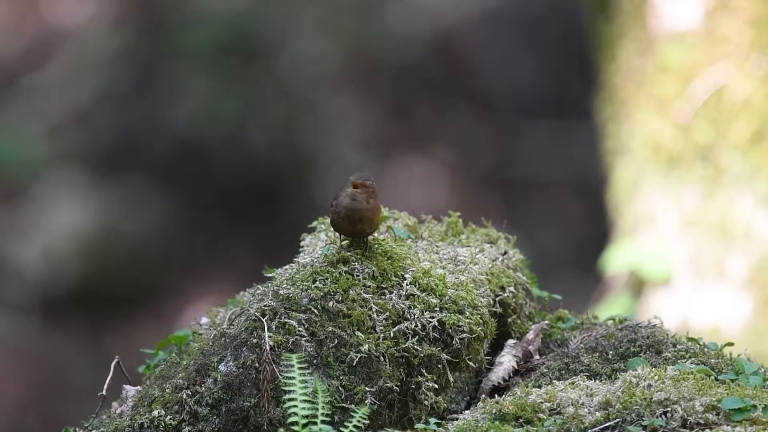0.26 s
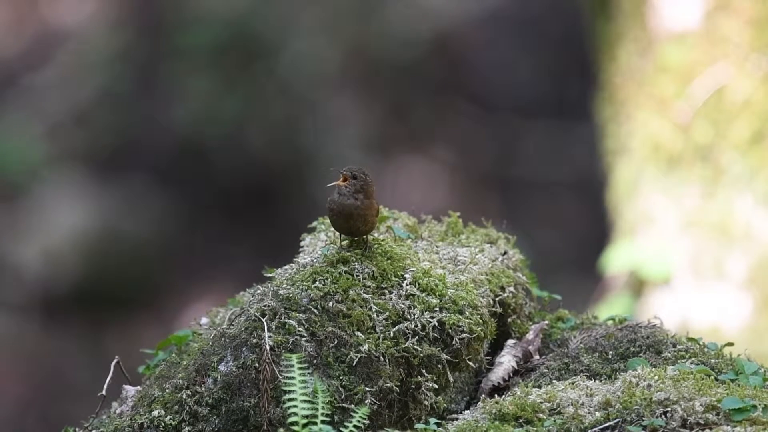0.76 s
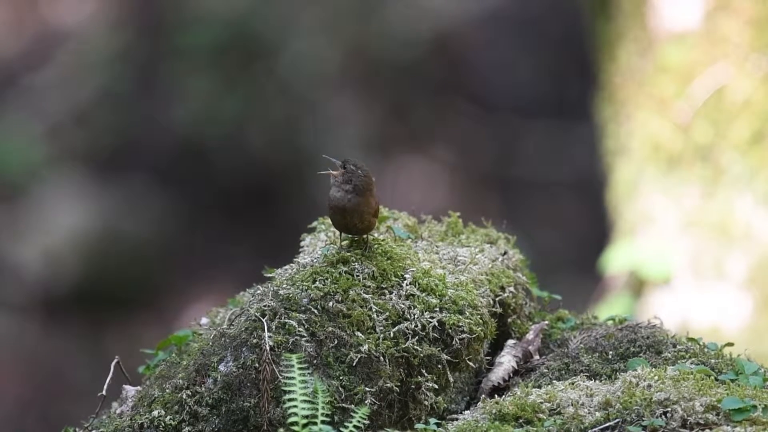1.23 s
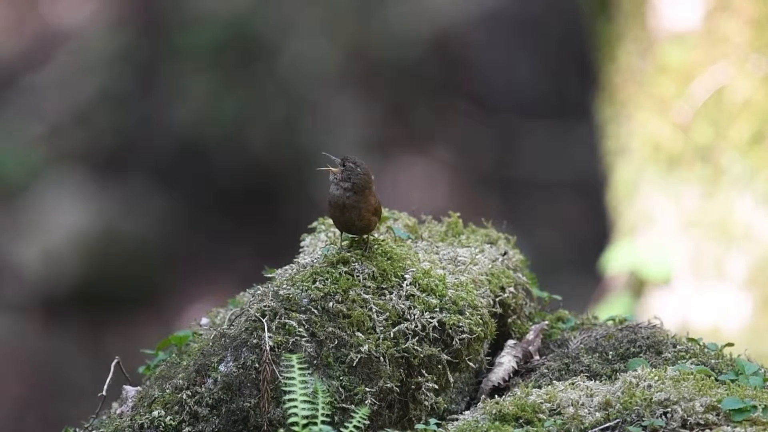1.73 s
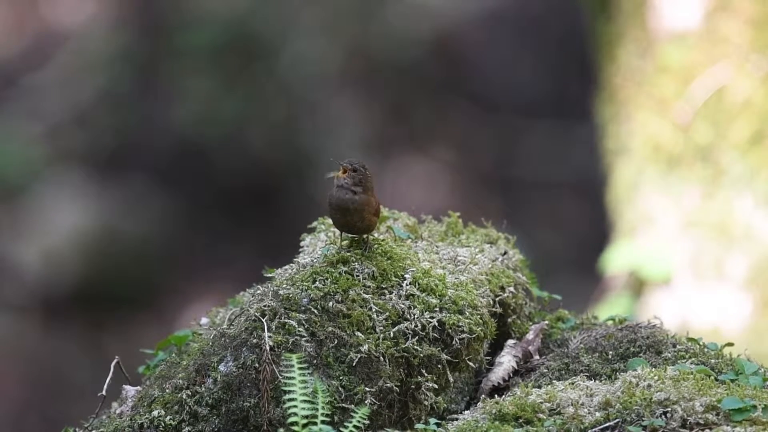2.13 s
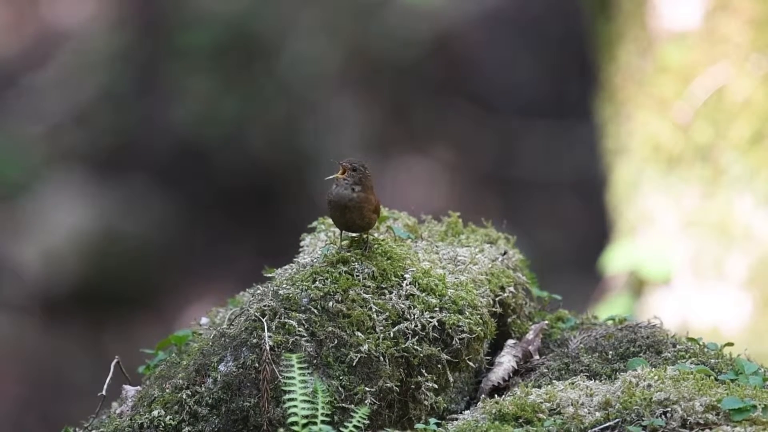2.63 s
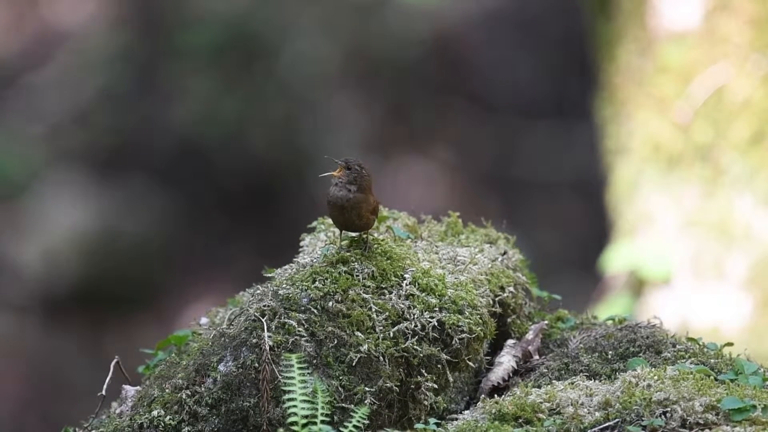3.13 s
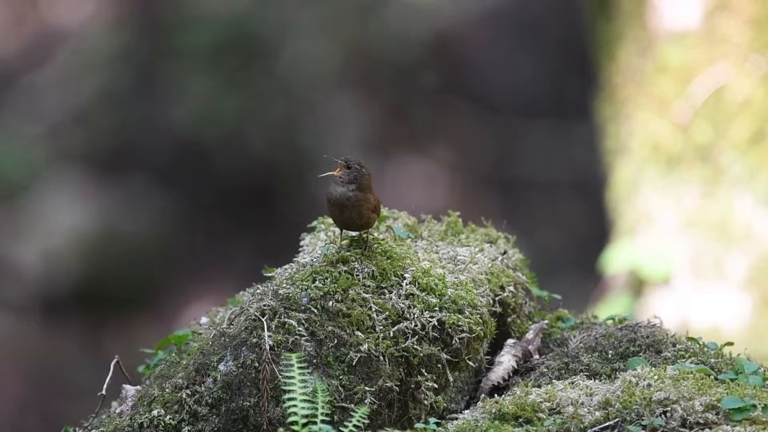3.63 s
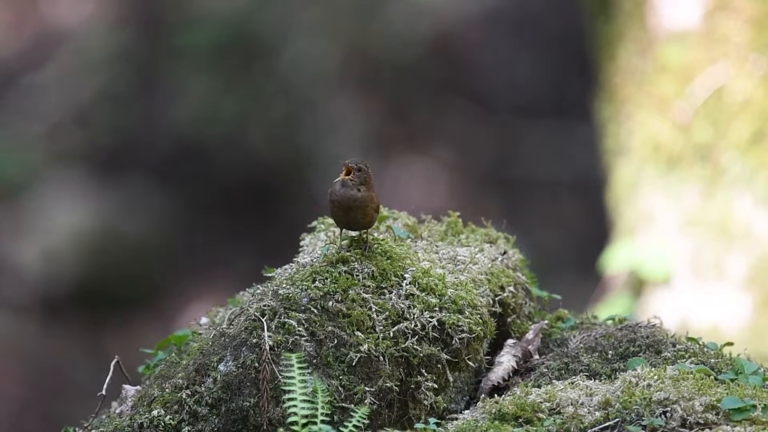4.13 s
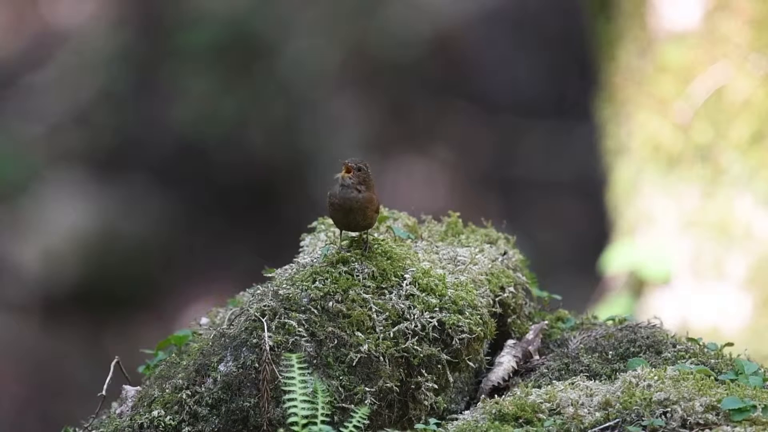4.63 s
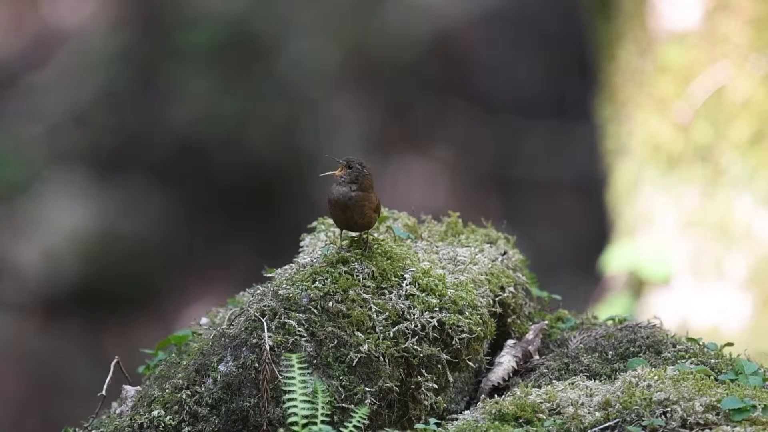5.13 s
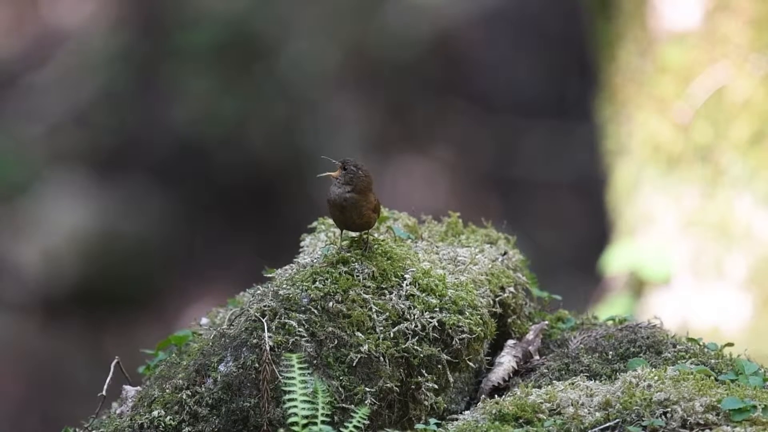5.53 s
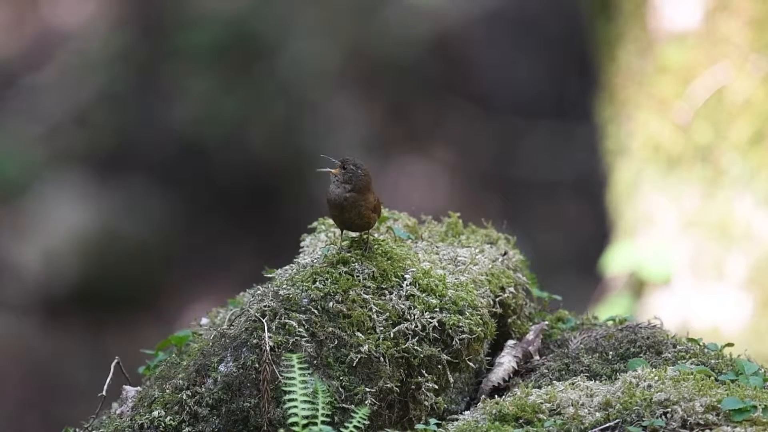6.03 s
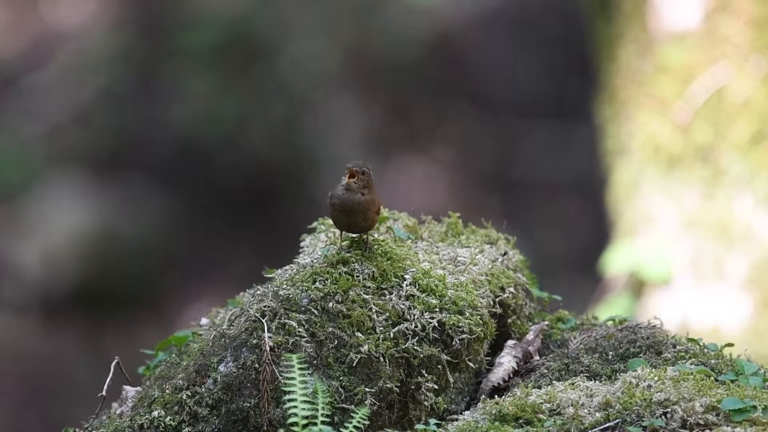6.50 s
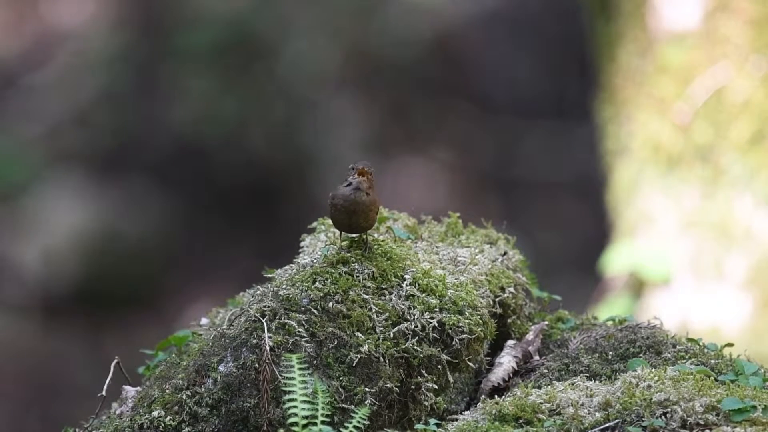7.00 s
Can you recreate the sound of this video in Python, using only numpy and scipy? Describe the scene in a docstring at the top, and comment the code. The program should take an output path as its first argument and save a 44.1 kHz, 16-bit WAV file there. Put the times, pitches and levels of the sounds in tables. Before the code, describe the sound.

Rapid high bird song, thin sliding whistles, sharp chips and a rattling trill, rings lightly among trees above constant rushing water.

```python
"""Wren beside a ravine stream

A wren sings one long song from a mossy rock in a wooded ravine, over the even rush of a stream.
Its voice is a nearly pure gliding sine: slurs and chips, practised figures, dry trills, a run of upsweeps.
The ground returns one quick echo; trunks and rocks scatter every note into a short tail of small echoes.
The bird sits almost straight ahead; the water, shaped from noise, is central in the bass, wide in the treble."""
import sys
import numpy as np
from scipy import signal
from scipy.fft import rfft, irfft
from scipy.io import wavfile
from scipy.ndimage import uniform_filter1d

SR = 44100
rng = np.random.default_rng(int(sys.argv[2]) if len(sys.argv) > 2 else 0)


def dump(signal):
    """Clip the signal to [-1, 1] and save it as 16-bit WAV at the path in sys.argv[1]."""
    limited = np.clip(np.atleast_2d(signal).T, -1, 1)
    pcm = np.round(limited * 32767).astype(np.int16)
    wavfile.write(sys.argv[1], SR, pcm)


N = 320166  # length in samples


def from_db(db):
    """Decibels to gain."""
    return 10 ** (np.asarray(db) / 20)


def rms_one(x):
    """Scale to unit rms."""
    return x / np.sqrt(np.mean(x ** 2) + 1e-20)


def at_hz(points, hz, axis=1):
    """Read one column of a table along log frequency."""
    table = np.array(points)
    return np.interp(np.log(np.maximum(hz, 1)), np.log(table[:, 0]), table[:, axis])


def drift(rate_hz, size):
    """Smooth random wander of spread 1: noise through two equal one-pole low-passes."""
    pole = np.exp(-2 * np.pi * rate_hz / SR)
    lead_in = SR // 10  # lets the filter settle; cut off again below
    noise = rng.standard_normal(size + lead_in)
    slow = signal.lfilter([1], [1, -2 * pole, pole * pole], noise)
    return rms_one(slow)[-size:]


def stream(level_db=-33.5, churn_db=0.86, churn_hz=14):
    """Countless far splashes merge into a rush of shaped noise; each octave of it churns a little."""
    # relative spectrum of the water: hz, density_db (per Hz)
    spectrum = [(30, -32), (55, -18), (90, -3), (150, -2), (270, -6), (450, -1.5), (750, -3.5), (1700, -1),
                (3200, -4), (6000, -6.5), (8800, -9), (10500, -17), (12500, -26.5), (15500, -32.5)]
    # its spread between the microphones: hz, side_minus_mid_db, left_minus_right_db
    spread = [(130, -51, 0), (330, -30.5, 0.1), (700, -11.5, -0.5), (1440, -2, -2), (3100, 0.5, -1.3),
              (9000, 0, -3.5), (14000, -1.5, -3)]
    hz = np.arange(N // 2 + 1) * SR / N
    sides = np.array([[1], [-1]])  # left, right
    width = from_db(at_hz(spread, hz))
    mid, side = rfft(rng.standard_normal((2, N)))
    balance_db = sides * at_hz(spread, hz, axis=2) / 2
    colour = from_db(at_hz(spectrum, hz) + balance_db)
    rush = colour * (mid + sides * width * side) / np.hypot(1, width)
    # everything below 256 Hz churns together, as does everything above 8192 Hz
    octave = np.clip(np.log2(np.maximum(hz, 1)).astype(int), 7, 13)
    water = np.zeros((2, N))
    for k in np.unique(octave):
        band = irfft(rush * (octave == k), N)
        water += band * from_db(churn_db * drift(churn_hz, N))
    return from_db(level_db) * rms_one(water)


def whistle(points, waver_share=.0009, waver_hz=180, flutter_db=1.09, third_db=-54, edge_s=0.00037):
    """One stereo note: a sine on a gliding pitch, with a slight tremor and two faint overtones."""
    # the throat lets more of the octave through on low notes: pitch_hz, octave_db
    octave_levels = [(4100, -34), (4750, -31.5), (5000, -42), (6500, -48)]
    # the bird almost straight ahead, by pitch: pitch_hz, left_minus_right_db, left_lag_radians
    bearing = [(4100, 2, 0.18), (4940, 0, 0.56), (5860, 1.7, 0.28), (6950, 1, 1.51), (8250, -1, 0.76)]
    s, hz, db = np.transpose(points)
    t = np.arange(s.min(), s.max(), 1 / SR)
    # the muscles of the syrinx round the corners of each glide
    smooth_hz = uniform_filter1d(np.interp(t, s, hz), size=161, mode="nearest")
    pitch = smooth_hz * (1 + waver_share * drift(waver_hz, len(t)))

    from_edge_s = np.minimum(t - t[0], t[-1] - t)
    fade = np.sin(np.pi / 2 * np.clip(from_edge_s / edge_s, 0, 1))
    loudness = fade * from_db(np.interp(t, s, db) + flutter_db * drift(waver_hz, len(t)))

    # the left microphone hears each cycle a little later than the right
    sides = np.array([[.5], [-.5]])
    phase = 2 * np.pi * np.cumsum(pitch) / SR - sides * at_hz(bearing, pitch, axis=2)
    second = from_db(at_hz(octave_levels, pitch)) * np.sin(2 * phase)
    third = from_db(third_db) * np.sin(3 * phase)
    tone = np.sin(phase) + second + third
    return loudness * from_db(sides * at_hz(bearing, pitch)) * tone


def glides(rows, attack_s, release_s, sag):
    """Notes of one bend: pitch follows a parabola, sagging while the throat opens and closes."""
    # how strongly the notes sound at each pitch: pitch_hz, gain_db
    carry = [(3700, 2.5), (4100, -6.5), (4600, -0.06), (6500, 0.5), (7000, -3.5), (7400, -6), (7900, -0.2),
             (8500, 2.5)]
    opening_share, opening_s, closing_share, closing_s = sag
    share = np.linspace(0, 1, 200)
    notes = []
    for start, length, first_hz, middle_hz, last_hz, level_db, *swell in rows:
        since, until = share * length, (1 - share) * length
        bend = np.polyfit([0, .5, 1], [first_hz, middle_hz, last_hz], 2)
        hz = np.polyval(bend, share)
        attack = np.sin(np.pi / 2 * np.minimum(since / attack_s, 1))
        release = np.sin(np.pi / 2 * np.minimum(until / release_s, 1))
        gate_db = 20 * np.log10(attack * release + 1e-6)
        swell_db = sum(swell) * (share - .5)  # zero for notes without a swell
        db = level_db + swell_db + at_hz(carry, hz) + gate_db
        opening_sag = opening_share * np.maximum(1 - since / opening_s, 0) ** 2
        closing_sag = closing_share * np.maximum(1 - until / closing_s, 0) ** 2
        notes.append(np.c_[start + since, hz * (1 - opening_sag - closing_sag), db])
    return notes


def slurs():
    """Whistles with one smooth bend, swelling or fading from start to end."""
    # each slur, before sag and carry: start_s, length_s, first_hz, middle_hz, last_hz, level_db, swell_db
    slur_rows = [(0.031, 0.029, 4580, 4810, 5860, -14, -10), (0.113, 0.021, 8200, 8220, 7950, -26.5, -2),
                 (0.166, 0.137, 7070, 7540, 7680, -18.5, 1), (0.365, 0.066, 6040, 5470, 5534, -8, -6),
                 (0.541, 0.11, 6660, 6750, 6020, -11.5, 5), (0.78, 0.038, 7000, 5370, 5340, -6, -5.5),
                 (1.083, 0.11, 7540, 7830, 7300, -14, 2), (2.483, 0.097, 8040, 8360, 8460, -16, 1),
                 (2.632, 0.11, 7390, 6940, 5390, -10.5, 13.0), (3.008, 0.037, 6600, 5990, 5920, -5, 5),
                 (3.212, 0.038, 6680, 5806, 5910, -5.0, -6), (3.686, 0.089, 8820, 7075, 6850, -10.5, 10.5),
                 (5.191, 0.029, 8950, 7820, 7900, -12.5, -6.5), (5.246, 0.136, 6950, 7560, 7970, -13.5, 0),
                 (6.39, 0.073, 5750, 5385, 5150, -6.0, 0.5)]
    # pitch sag as the throat opens and closes: start_share, opening_s, end_share, closing_s
    slur_sag = (0.0377, 0.015, 0.051, 0.0098)
    return glides(slur_rows, attack_s=.026, release_s=0.013, sag=slur_sag)


def chips():
    """Short sharp notes that arch or dive on one quick bend."""
    # each chip, before sag and carry: start_s, length_s, first_hz, middle_hz, last_hz, level_db
    chip_rows = [(0.469, 0.025, 4220, 4240, 3780, -10), (0.67, 0.016, 4530, 4630, 4490, -13.0),
                 (0.71, 0.028, 4380, 4200, 3990, -10.0), (2.176, 0.05, 5760, 4830, 4020, -6.5),
                 (2.268, 0.016, 4470, 5020, 4580, -10.5), (2.291, 0.044, 6100, 4490, 4050, -7),
                 (2.373, 0.018, 4350, 4970, 4620, -11), (2.396, 0.04, 5860, 4530, 4000, -7),
                 (2.772, 0.015, 4220, 4590, 4350, -9.0), (2.816, 0.03, 4590, 5000, 4220, -9.5),
                 (3.423, 0.039, 5020, 4740, 4154, -8.5), (3.623, 0.015, 4100, 4200, 4100, -15.5),
                 (3.811, 0.051, 5830, 4870, 3980, -7), (3.9, 0.047, 5530, 4740, 3910, -7),
                 (5.434, 0.023, 5800, 6180, 6210, -11), (5.665, 0.021, 5980, 6170, 6900, -12),
                 (5.911, 0.019, 5950, 5980, 6520, -10.5), (6.496, 0.033, 4390, 4285, 3900, -9.5),
                 (6.752, 0.02, 5210, 5070, 5130, -14.0), (6.809, 0.023, 5580, 5700, 5810, -8.5),
                 (6.949, 0.022, 5330, 5690, 5610, -8)]
    # pitch sag as the throat opens and closes: start_share, opening_s, end_share, closing_s
    chip_sag = (.01, 0.007, 0.019, 0.0046)
    return glides(chip_rows, attack_s=0.0094, release_s=0.0098, sag=chip_sag)


def figures(shape, rows):
    """One practised shape, stretched to the length and pitch range of each row."""
    share, climb, db = np.transpose(shape)
    notes = []
    for start, length, low_hz, high_hz, level_db in rows:
        hz = low_hz + climb * (high_hz - low_hz)
        notes.append(np.c_[start + share * length, hz, level_db + db])
    return notes


def held_whistles():
    """Overshoots a little, settles on its pitch and droops as it stops."""
    # the gesture: length_share, pitch_range_share, relative_db
    held_shape = [(0, .6, -19), (.1, .82, -6.5), (.24, 0.7, -2), (.4, .57, 0.5), (.87, 0.58, -0.5),
                  (.95, .42, -3), (1, .05, -13)]
    # each time it is sung: start_s, length_s, low_hz, high_hz, level_db
    held_rows = [(0.847, 0.033, 5816, 6000, -6), (1.252, 0.087, 4560, 4950, -9),
                 (3.313, 0.075, 3760, 4340, -13), (3.508, 0.082, 4730, 5135, -5),
                 (6.150, 0.089, 4510, 5016, -8.5)]
    return figures(held_shape, held_rows)


def flourishes():
    """Gliding figures sung only once each, drawn as short curves."""
    # one curve for each flourish: time_s, pitch_hz, level_db
    curves = [
        [(0.922, 7140, -29), (0.963, 7910, -13), (0.993, 7430, -21.5), (1.017, 7200, -16), (1.033, 7270, -19.5)],
        [(2.007, 5000, -24), (2.012, 5210, -14.5), (2.034, 5277, -5.5), (2.046, 5640, -5), (2.055, 6200, -11.5),
         (2.066, 7600, -22.5), (2.084, 7920, -18), (2.13, 7420, -19)],
        [(4.432, 5860, -20), (4.447, 5930, -4), (4.491, 5892, -5), (4.526, 4640, -9), (4.532, 4180, -30)],
        [(6.577, 6500, -24), (6.583, 6700, -14), (6.6, 7400, -17), (6.626, 8320, -15.5), (6.673, 7340, -21.5),
         (6.702, 7100, -8), (6.714, 6510, -11), (6.717, 6540, -36)],
    ]
    return list(curves)


def trills(tick_s=0.0155, tick_low_hz=3655, uneven_db=0.5, uneven_hz=28):
    """Tiny upward flicks at an even pace, each a little different in strength and top pitch."""
    # one tick: length_share, pitch_range_share, relative_db
    tick_shape = [(0, 0.058, -21), (.27, 0.47, -16.5), (.47, 0.92, -4), (.6, 1, 1), (.78, .98, -2.5),
                  (1, 0.97, -14)]
    # each run: first_tick_s, last_tick_s, ticks_per_s, mean_top_hz, first_level_db, last_level_db
    trill_rows = [(1.357, 1.394, 28, 4790, -14.5, -14.5), (1.4266, 1.9506, 30.5, 4715, -11.5, -13),
                  (6.260, 6.33, 28, 4830, -17, -12.5)]
    ticks = []
    for first, last, per_s, top_hz, first_db, last_db in trill_rows:
        count = round((last - first) * per_s) + 1
        for start, level_db in np.linspace((first, first_db), (last, last_db), count):
            pitch, strength = rng.standard_normal(2)
            tick_top_hz = top_hz + uneven_hz * pitch
            tick_db = level_db + uneven_db * strength
            ticks.append((start, tick_s, tick_low_hz, tick_top_hz, tick_db))
    return figures(tick_shape, ticks)


def hooks():
    """A held note that breaks and falls."""
    # the gesture: length_share, pitch_range_share, relative_db
    hook_shape = [(0, 0.21, -23), (.04, 0.69, -5), (.1, 0.93, -1.5), (.56, 0.96, -5.5), (.665, 0.63, -15),
                  (.73, .53, -9), (.935, 0.21, 0), (1, 0.049, -14)]
    # each time it is sung: start_s, length_s, low_hz, high_hz, level_db
    hook_rows = [(2.891, 0.11, 4840, 6610, -5), (3.101, .106, 4840, 6565, -5.5)]
    return figures(hook_shape, hook_rows)


def upsweeps():
    """Notes that climb ever faster, most of them in one close run."""
    # the gesture: length_share, pitch_range_share, relative_db
    upsweep_shape = [(0, 0, -20.5), (.2, .18, -7), (.39, .25, -0.5), (.61, .41, 0), (.8, .66, -.5),
                     (.91, 0.84, -0.5), (1, 1, -17)]
    # each time it is sung: start_s, length_s, low_hz, high_hz, level_db
    upsweep_rows = [(3.976, 0.065, 3990, 6060, -6.5), (4.571, .044, 4030, 6140, -7),
                    (4.649, .044, 4030, 6210, -7.5), (4.723, .044, 4010, 6290, -7),
                    (4.797, 0.042, 4060, 6040, -7), (4.873, 0.042, 4030, 6040, -6.5),
                    (4.947, .044, 4030, 6200, -6.5), (5.022, .044, 4010, 6270, -7.5),
                    (5.099, .044, 3990, 6320, -7.5)]
    return figures(upsweep_shape, upsweep_rows)


def leaps():
    """A loud low note jumps to a thin top and comes back."""
    # the gesture: length_share, pitch_range_share, relative_db
    leap_shape = [(0, 0.147, -16), (.145, 0.057, 0), (.325, 0.015, 0), (.47, 0.61, -9), (.57, 0.99, -8),
                  (.72, .9, -18), (.82, .52, -15), (.94, .34, -4.5), (1, 0.14, -18)]
    # each time it is sung: start_s, length_s, low_hz, high_hz, level_db
    leap_rows = [(4.090, 0.12, 6380, 7940, -5), (4.260, .120, 6500, 7870, -6.5)]
    return figures(leap_shape, leap_rows)


def scoops():
    """Dips onto a held pitch, then fades and curls upward."""
    # the gesture: length_share, pitch_range_share, relative_db
    scoop_shape = [(0, 0.515, -12), (.08, .03, -4.5), (.38, 0.066, -0.5), (.52, 0.18, -8.5), (.8, .3, -8.5),
                   (1, 1, -13)]
    # each time it is sung: start_s, length_s, low_hz, high_hz, level_db
    scoop_rows = [(5.467, 0.14, 6770, 7630, -10.5), (5.697, 0.15, 6800, 7730, -10),
                  (5.940, .140, 6610, 7800, -9.5)]
    return figures(scoop_shape, scoop_rows)


def dips():
    """Falls almost out of hearing and springs back."""
    # the gesture: length_share, pitch_range_share, relative_db
    dip_shape = [(0, 0.93, -8), (.09, .87, -2), (.21, .62, 0.5), (.34, 0.41, -6.5), (.52, 0.049, -22.5),
                 (.65, .14, -19), (.84, .7, .5), (1, 0.54, -12)]
    # each time it is sung: start_s, length_s, low_hz, high_hz, level_db
    dip_rows = [(6.838, 0.068, 3560, 5320, -7), (6.981, 0.069, 3680, 5290, -7)]
    return figures(dip_shape, dip_rows)


def wren():
    """All notes of the song, each in its place."""
    notes = slurs() + chips() + held_whistles() + flourishes() + trills()
    notes += hooks() + upsweeps() + leaps() + scoops() + dips()
    song = np.zeros((2, N))
    for note in notes:
        start = max(round(note[0][0] * SR), 0)
        sound = whistle(note)[:, :N - start]
        song[:, start:start + sound.shape[1]] += sound
    return song


def ground(song, delay_s=0.0018, echo_db=-21):
    """The rock and the ground below the bird give one quick echo that ripples the glides."""
    lag = round(delay_s * SR)
    return from_db(echo_db) * np.pad(song, ((0, 0), (lag, 0)))[:, :N]


def ravine(song, echoes_per_s=2500, gather_s=.013, t60_s=0.58, tail_db=-12):
    """Many small echoes off trunks and rocks, other ones on each side; they gather, then thin away."""
    t = np.arange(SR) / SR
    hits = rng.random((2, SR)) < echoes_per_s / SR
    echoes = hits * rng.standard_normal((2, SR))
    gathering = 1 - np.exp(-(t / gather_s) ** 2)
    decay = np.exp(-np.log(1000) * t / t60_s)  # down 60 dB after t60_s
    echoes = echoes * gathering * decay
    echoes = echoes / np.sqrt(np.sum(echoes ** 2, axis=1, keepdims=True))  # unit energy on each side
    return from_db(tail_db) * signal.fftconvolve(song, echoes, axes=1)[:, :N]


def scene():
    """The bird, its echoes and the water."""
    song = wren()
    return song + ground(song) + ravine(song) + stream()


def record(dry, cutoff_hz=15750):
    """The top is cut steeply by an elliptic low-pass."""
    low_pass = signal.ellip(14, .1, 80, cutoff_hz, fs=SR, output="sos")
    return signal.sosfilt(low_pass, dry)


dry = scene()
out = record(dry)
dump(out)
```